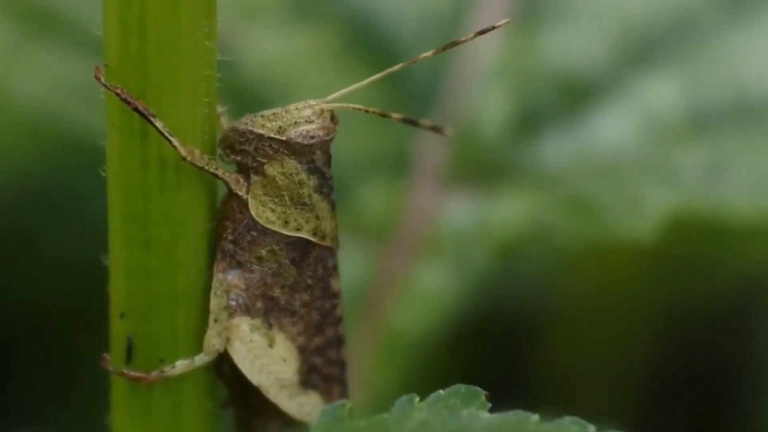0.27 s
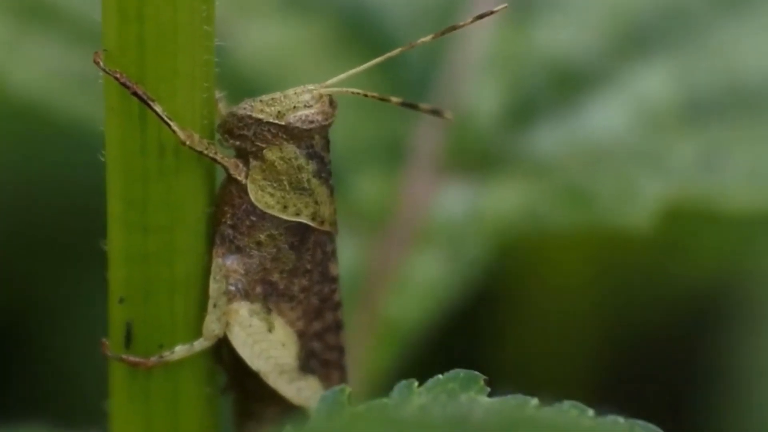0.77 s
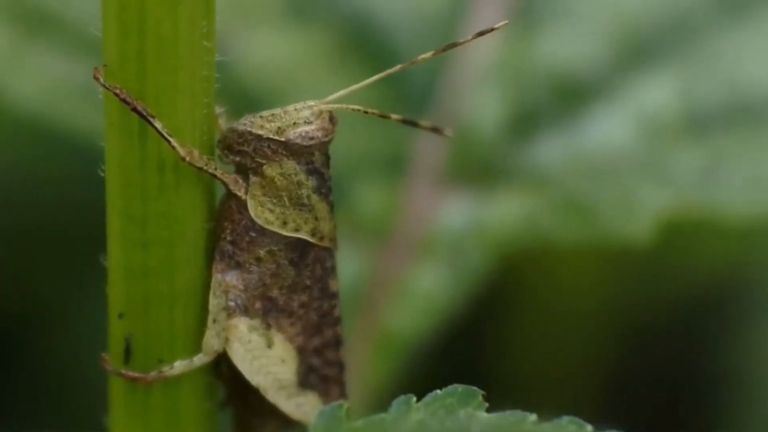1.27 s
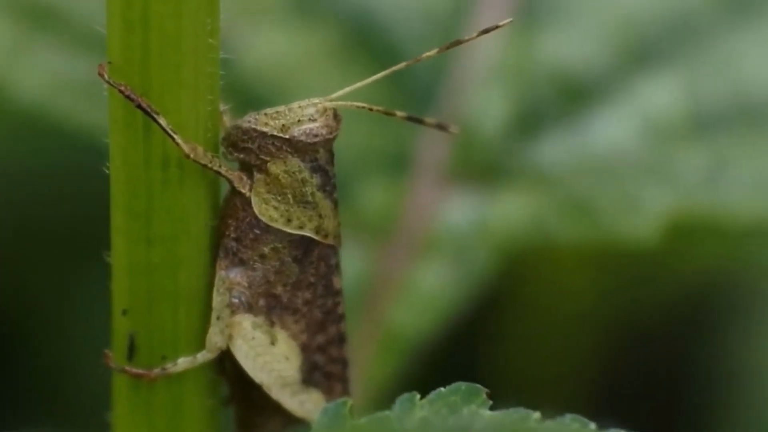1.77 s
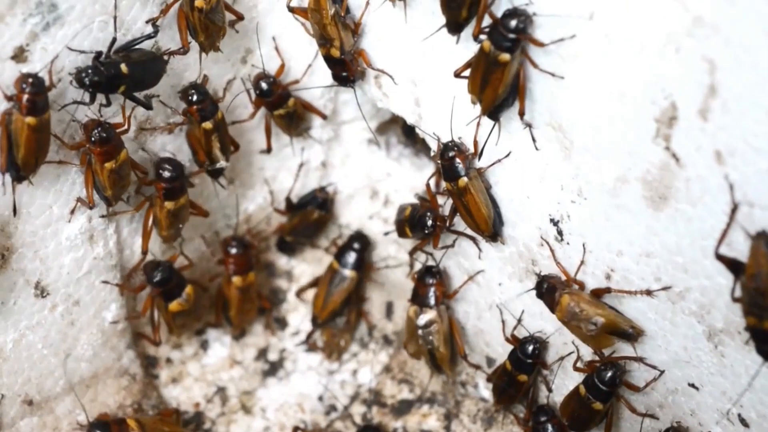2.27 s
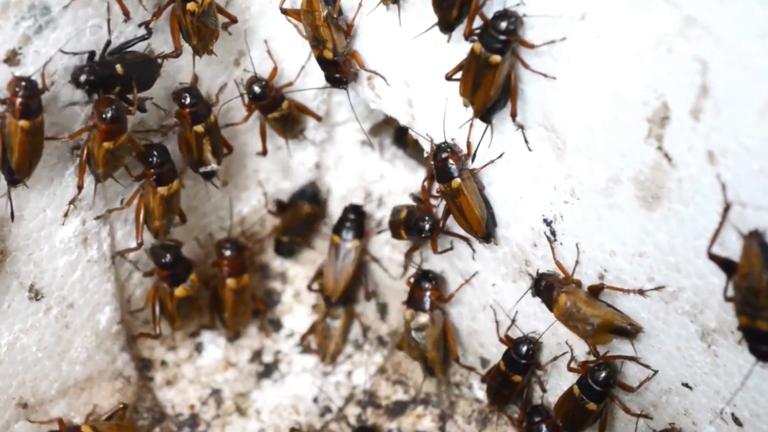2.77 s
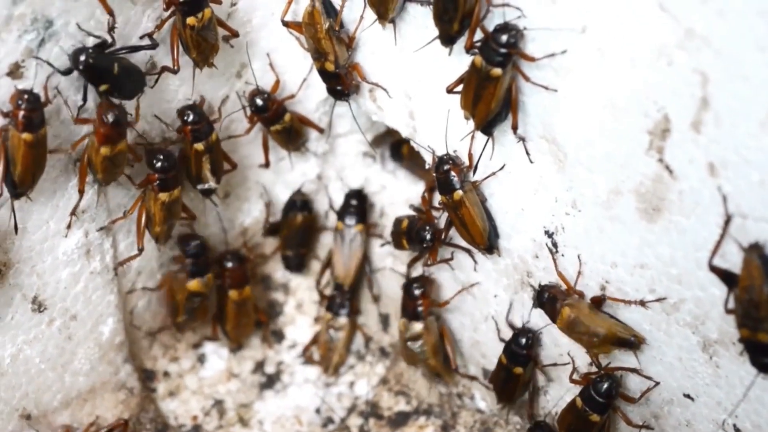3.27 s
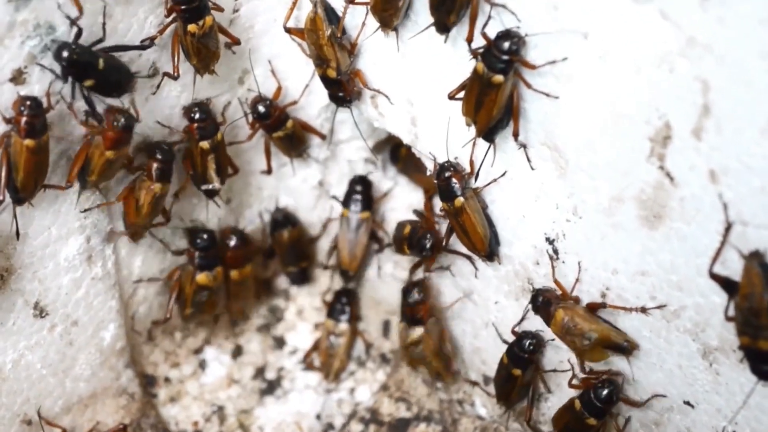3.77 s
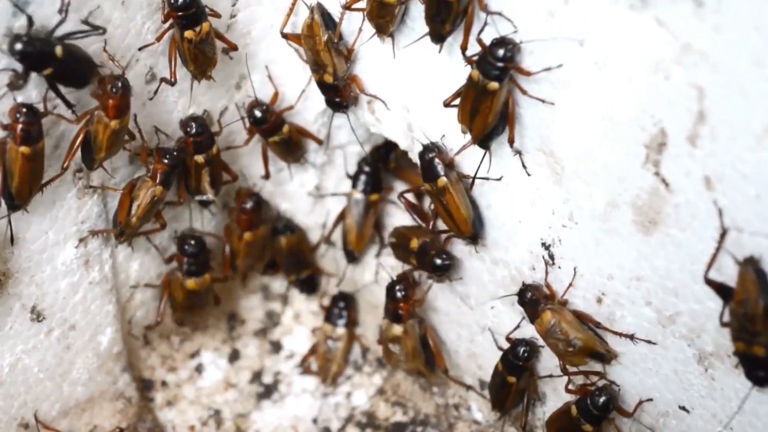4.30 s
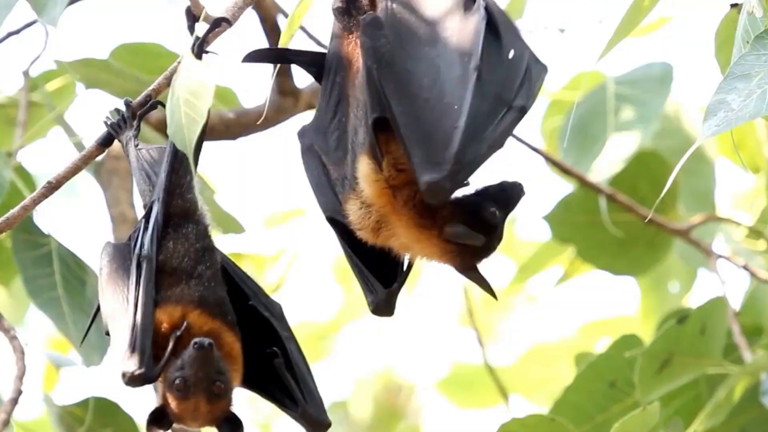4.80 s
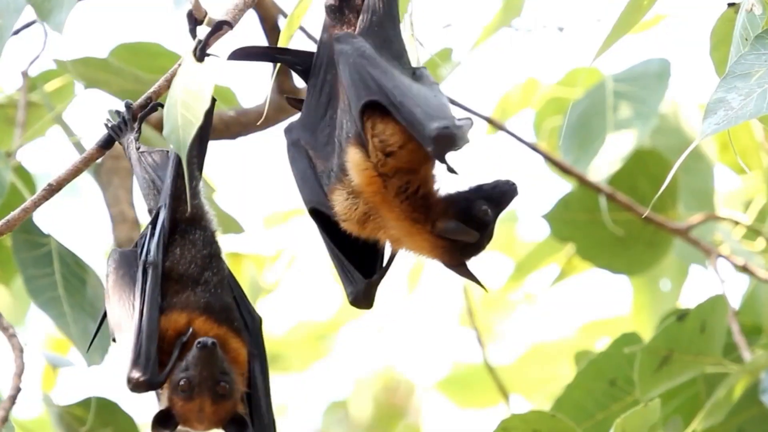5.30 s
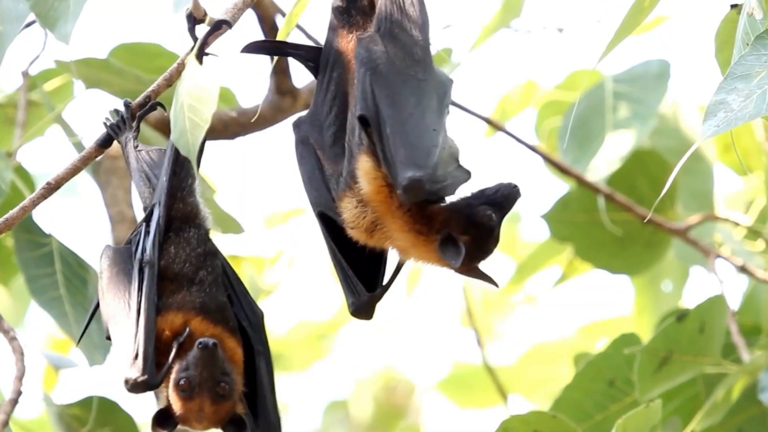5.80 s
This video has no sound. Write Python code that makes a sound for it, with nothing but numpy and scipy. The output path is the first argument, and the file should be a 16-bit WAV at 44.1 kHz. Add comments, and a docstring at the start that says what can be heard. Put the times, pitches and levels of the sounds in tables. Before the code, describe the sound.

Outdoors, a bush cricket gives thin, high buzzing swells through leaves over low far traffic. A hard cut brings a field cricket close to the microphone, chirping in bright clipped groups of up to four falling pulses, with distant birds and a pulsing caller behind. After a tiny silence, dull steady air hiss begins, and bats squeal and chatter harshly over it.

```python
"""Two crickets and a bat roost

Three outdoor places, one after another. A bush cricket trills in swells, its fast strokes blurred by leaves, over
far traffic of coloured noise and drone tones. Then a field cricket chirps close by, up to four falling wing strokes
at a time, each a gliding tone with scrapes and overtones; faint whistling birds and a pulsing far caller lie behind.
After a short silence comes the steady noise hiss of a bat roost, with gliding squeals and rasping chatter."""
import sys
import numpy as np
from scipy import signal
from scipy.fft import rfft, irfft, next_fast_len
from scipy.io import wavfile
from scipy.ndimage import uniform_filter1d

SR = 44100
rng = np.random.default_rng(int(sys.argv[2]) if len(sys.argv) > 2 else 0)


def pcm_store(signal):
    """Save signal as 16-bit PCM."""
    levels = np.round(np.clip(np.atleast_2d(signal), -1, 1) * 32767)
    wavfile.write(sys.argv[1], SR, levels.astype(np.int16).T)


N = 266716
TIME = np.arange(N) / SR
MEADOW_END_S, CHIRPS_END_S, ROOST_START_S = 1.957, 4.858, 4.98

# The field cricket's wing strokes, in chirps of up to four. Each row: start in seconds, length in seconds,
# peak in dB before judder, first pitch in Hz, last pitch in Hz, share of the length before the peak,
# reopening rub in dB before its mix gain, scuff in dB.
STROKES = [(1.944, 0.038, -30.5, 3514, 3093, 0.4, -54, -55), (2, 0.035, -26, 3583, 3080, 0.36, -53, -50.5),
           (2.056, 0.038, -27, 3590, 3140, .45, -46.5, -52),
           (2.494, 0.021, -41, 3374, 3046, 0.67, -49, -52.5),
           (2.529, 0.039, -26.5, 3564, 3130, 0.48, -52.5, -60),
           (2.586, 0.037, -25.5, 3570, 3074, 0.39, -46, -52), (2.643, 0.039, -28, 3573, 3230, .5, -46, -52),
           (3.0655, 0.0207, -31.5, 3410, 3010, 0.52, -46, -56),
           (3.104, 0.031, -25.5, 3580, 3124, 0.44, -48, -45.5),
           (3.158, 0.037, -24, 3537, 3120, 0.23, -43, -48), (3.216, 0.036, -24, 3545, 3244, 0.57, -43, -62),
           (3.609, 0.019, -41.5, 3397, 3100, 0.58, -51.5, -54),
           (3.650, 0.032, -28, 3540, 3117, .42, -48, -47), (3.703, 0.031, -28, 3550, 3320, 0.5, -48, -51),
           (3.763, .04, -33.5, 3590, 3090, 0.48, -45.5, -44),
           (4.215, 0.018, -34.5, 3436, 3130, 0.77, -57, -58),
           (4.255, 0.034, -27.5, 3544, 3133, .4, -54.5, -54),
           (4.307, 0.039, -26, 3553, 3220, 0.38, -43.5, -53),
           (4.366, 0.032, -28, 3566, 3350, 0.71, -42.5, -52),
           (4.807, 0.016, -35.5, 3390, 3070, .5, -46.5, -56),
           (4.841, 0.036, -26, 3560, 3210, 0.65, -51.5, -51)]
# Colour of the tyre noise and the whoosh. Each row: pitch in Hz, relative level in dB.
MEADOW_AIR = [(60, -21), (150, -3.5), (400, -1), (600, -6), (1000, -8.5), (2000, -12), (4000, -20.5),
              (7000, -23), (10000, -24.5), (14300, -31.5), (15300, -64)]
# How alike left and right are in the meadow. Each row: pitch in Hz, correlation (1 = the same).
MEADOW_LIKENESS = [(50, 1), (150, 0.65), (400, 0.37), (1000, 0.06)]
# How alike left and right are around the field cricket. Each row: pitch in Hz, correlation (1 = the same).
CHIRP_LIKENESS = [(50, 0.29), (400, 0.047), (4000, 0.067), (14000, 0.2)]


def from_db(db):
    """Decibels to gain."""
    return 10 ** (np.asarray(db) / 20)


def rms_one(x):
    """Scale to an rms (average strength) of 1."""
    return x / np.sqrt(np.mean(x ** 2) + 1e-20)


def in_time(rows):
    """Each column of a time table, read at every sample."""
    s, *columns = np.transpose(rows)
    return [np.interp(TIME, s, column) for column in columns]


def at_hz(points, hz):
    """Read a table along a logarithmic pitch axis."""
    known, values = np.transpose(points)
    return np.interp(np.log(hz + 1), np.log(known), values)


def pan(left_db):
    """Gains that make the left channel this many dB louder than the right."""
    return from_db(np.array([[left_db], [-left_db]]) / 2)


def drift(rate):
    """Random wandering with spread 1; a higher rate in Hz wanders faster."""
    r = np.exp(-2 * np.pi * rate / SR)
    wander = signal.lfilter([1], [1, -2 * r, r * r], rng.standard_normal(N + SR))
    return rms_one(wander[SR:])  # the first second lets the filter settle


def resonate(x, hz, width):
    """A resonance with a gain of about 1 at its peak; pitch and width in Hz."""
    r = np.exp(-np.pi * width / SR)
    zeros = np.array([1, 0, -1]) * (1 - r * r) / 2
    poles = [1, -2 * r * np.cos(2 * np.pi * hz / SR), r * r]
    return signal.lfilter(zeros, poles, x + 1e-18)


def resonate_twice(x, hz, width):
    """The same resonance two times over, for steeper sides."""
    return resonate(resonate(x, hz, width), hz, width)


def air(spectrum, likeness):
    """Stereo noise of a given colour and left-right likeness, rms 1."""
    size = next_fast_len(N)
    hz = np.arange(size // 2 + 1) * SR / size
    mid, side = rfft(rng.standard_normal((2, size))) * from_db(at_hz(spectrum, hz))
    alike = np.clip(at_hz(likeness, hz), -1, 1)
    both = np.sqrt(1 + alike) * mid + np.sqrt(1 - alike) * side * [[1], [-1]]
    return rms_one(irfft(both, size)[:, :N])


def scatter(x, t60):
    """Dense dying reflections from leaves and ground, different for each ear, as loud as the source."""
    fade = from_db(-60 * TIME[:SR // 2] / t60)  # 60 dB down after t60 seconds
    paths = rng.standard_normal((2, SR // 2)) * fade
    return np.array([rms_one(signal.fftconvolve(x, path)[:N]) for path in paths]) * np.std(x)


def phase_of(hz):
    """Running phase of a moving pitch."""
    return 2 * np.pi * np.cumsum(hz) / SR


def span(start, length):
    """Samples of an event, and its progress from 0 to 1."""
    at = np.flatnonzero((TIME > start) & (TIME < start + length))
    return at, (TIME[at] - start) / length


def arch(progress, power):
    """Swell and fade of one stroke or call; a higher power makes it narrower."""
    return np.abs(np.sin(np.pi * progress)) ** power


def calls(rows, waver_rate):
    """Gliding whistles: sine tones with an unsteady pitch."""
    out, unsteady = np.zeros(N), drift(waver_rate)
    for start, length, db, first_hz, last_hz, waver in rows:
        at, progress = span(start, length)
        hz = (first_hz + (last_hz - first_hz) * progress) * (1 + waver * unsteady[at])
        out[at] += from_db(db) * arch(progress, power=.8) * np.sin(phase_of(hz))
    return out


def field_cricket(bend=2.3, judder_db=1.24, octave_db=-28, octave_mode_db=-21, scrape_db=-33, echo_db=-21,
                  rub_hz=3400, rub_width=300, reopen_s=0.029, rub_modes_db=-22, thump_db=-24):
    """The scraper runs along the file, one tooth a cycle, juddering and slowing; the wings rub as they reopen."""
    # Resonances of the wings. Each row: pitch in Hz, width in Hz of each of two passes, relative level in dB.
    wing_modes = [(2750, 200, -17), (3920, 160, -11.5), (5900, 1500, -4), (6600, 210, 6.5),
                  (9150, 540, -15)]
    # Thin overtones, which sag a little with each stroke. Each row: starting pitch in Hz, dB against the stroke.
    thin_tones = [(8020, -40.5), (9480, -38.5), (10470, -51.5), (12930, -50), (13880, -62.5),
                  (15400, -61.5)]
    # Colour of the soft low thump in each stroke. Each row: pitch in Hz, relative level in dB.
    thump_colour = [(25, -11.5), (60, 4.5), (140, 5), (220, -2.5), (500, -42.5), (2000, -99.5)]
    sag, waver_hz = .33, 45  # overtones: share of the stroke's fall in pitch; unsteadiness

    force, rubbing, fall, hz = np.zeros(N), np.zeros(N), np.zeros(N), np.full(N, float(rub_hz))
    for start, length, db, first_hz, last_hz, peak_at, rub_db, _ in STROKES:
        at, progress = span(start, length)
        leaning = np.interp(progress, [0, np.clip(peak_at, .1, .9), 1], [0, .5, 1])  # moves the peak
        force[at] = from_db(db) * arch(leaning, power=.9)
        hz[at] = first_hz + (last_hz - first_hz) * progress ** bend
        fall[at] = 1 - hz[at] / first_hz
        at, progress = span(start + length / 2, length / 2 + reopen_s)
        rubbing[at] += from_db(rub_db) * arch(progress, power=.7)
    force = force * from_db(judder_db * drift(300))
    teeth = phase_of(hz + 10 * drift(220))

    # a wing mode picks out the octave near the top of each glide
    octave = force * np.sin(2 * teeth)
    octave = from_db(octave_db) * octave + from_db(octave_mode_db) * resonate(octave, 6930, 170)
    tone = force * np.sin(teeth) + octave

    overtones = np.zeros(N)
    for start_hz, db in thin_tones:
        overtone_hz = start_hz * (1 - sag * fall) + waver_hz * drift(400)
        overtones += from_db(db) * np.sin(phase_of(overtone_hz))
    overtones = force * overtones

    # uneven teeth shake the wing modes; these and the overtones radiate differently to each side
    grit = rng.standard_normal((2, N)) + rng.standard_normal(N)
    modes = sum(from_db(db) * resonate_twice(grit, mode_hz, width) for mode_hz, width, db in wing_modes)
    scrape = (from_db(scrape_db) * force + from_db(rub_modes_db) * rubbing) * rms_one(modes)
    sheen = overtones + scatter(overtones, t60=.012) / 2
    rub = rubbing * rms_one(resonate_twice(grit, rub_hz, rub_width))
    thump = from_db(thump_db) * force * air(thump_colour, CHIRP_LIKENESS)
    echo = from_db(echo_db) * scatter(tone, t60=.06)
    return (tone + scrape) * pan(-1.3) + sheen + echo + rub + thump


def wing_scuffs():
    """Short dry noise as one wing catches against the other just before each stroke."""
    # Colour of the scuffs. Each row: pitch in Hz, relative level in dB.
    scuff_colour = [(2200, -23), (2700, 11), (3000, 0.5), (3500, 6.5), (4600, -9.5), (5500, -5.5),
                    (6600, -1), (7500, -21), (9500, -17), (10500, -48.5), (15000, -59)]
    lead_s, scuff_s = 0.014, 0.027
    pressure = np.zeros(N)
    for start, *_, scuff_db in STROKES:
        at, progress = span(start - lead_s, scuff_s)
        pressure[at] += from_db(scuff_db) * arch(progress, power=1)
    return pressure * air(scuff_colour, CHIRP_LIKENESS)


def bush_cricket(fall_hz=1300, waver_hz=60, wing_hz=5110, wing_width=300, trill_db=-0.3, hard_db=1):
    """Short fast strokes, each falling in pitch, fused to a buzz by the foliage; now and then one bites harder."""
    # Strokes that stand out of the trill. Each row: start in seconds, peak in dB before hard_db.
    hard_strokes = [(0.3945, -32.5), (0.414, -34), (0.4604, -32.5), (0.5197, -32), (0.5506, -31),
                    (0.6175, -32), (0.6529, -29), (1.1383, -36), (1.258, -26.5)]
    strokes_per_s, jitter = 50.8, .1  # jitter is a share of the rate
    hard_s, hard_end_hz = .006, 5056

    strength, tooth_hz = swells()
    stroke = np.cumsum(strokes_per_s * (1 + jitter * drift(40))) / SR % 1  # progress within each stroke
    hz = tooth_hz + fall_hz * (.5 - stroke) + waver_hz * drift(170)
    contact = arch(stroke, power=16)
    song = resonate(contact * np.sin(phase_of(hz)), wing_hz, wing_width)

    # much of the sound arrives by way of the leaves; the trill keeps an even strength within a swell
    heard = from_db(-9.5) * song + scatter(song, t60=.2)
    nearby_power = uniform_filter1d(np.mean(heard ** 2, axis=0), size=700)
    even = heard / np.sqrt(nearby_power + 1e-12)

    hard_rows = [(s, hard_s, db, wing_hz, hard_end_hz, 0) for s, db in hard_strokes]
    hard = calls(hard_rows, waver_rate=1)
    return (from_db(trill_db) * strength * even + from_db(hard_db) * hard) * pan(0.88)


def swells():
    """Strength and pitch of the trill: each swell grows, holds and dies away; its pitch lifts, then stays."""
    # Each row: start in seconds, time until the fade in seconds, full level in dB before the trill's gain.
    swell_rows = [(-.48, 0.47, -44.5), (0.277, 0.37, -38), (1.03, 0.31, -37.5), (1.805, .35, -40.5)]
    attack_s, fade_db_per_s = 0.16, 95.5
    start_hz, full_hz, lift_s = 4816, 5056, 0.26
    strength, hz = np.zeros(N), np.full(N, float(full_hz))
    for start, held, db in swell_rows:
        age = TIME - start
        fading_db = db - fade_db_per_s * np.maximum(age - held, 0)
        strength += np.clip(age / attack_s, 0, 1) * from_db(fading_db)
        hz[age > 0] = np.interp(age[age > 0], [0, lift_s], [start_hz, full_hz])
    return strength, hz


def roost(rasp_db=2, shrill_db=0, squeal_db=1, low_squeaks_db=-2, high_squeaks_db=-2.0):
    """Steady hiss of the open air; the colony's rough chatter, scratchy bursts and squeals rise out of it."""
    # Hiss of the air. Each row: time in seconds, level in dB.
    hiss_level = [(4.98, -95), (5.0, -60), (5.012, -44.5), (5.035, -41), (5.5, -41.5), (6.05, -41.5)]
    # Rasping chatter. Each row: time in seconds, level in dB before the rasp's gains.
    chatter_level = [(5.25, -56), (5.308, -62.5), (5.656, -55), (5.76, -50.5), (5.84, -51), (5.866, -50),
                     (5.9, -53), (6.016, -47), (6.04, -50)]
    # Shrill scratchy bursts. Each row: start in seconds, length in seconds, peak in dB before the shrill gains.
    scratches = [(5.277, 0.14, -67), (5.41, 0.16, -69.5), (5.52, 0.11, -65.5), (5.623, 0.096, -67),
                 (5.688, 0.11, -56), (5.78, 0.12, -63.5), (5.857, .13, -64), (5.958, 0.095, -55)]
    # Bat squeals. Each row: start in seconds, length in seconds, peak in dB before mixing,
    # first pitch in Hz, last pitch in Hz.
    squeal_rows = [(5.294, 0.026, -50.5, 7870, 8300), (5.322, 0.03, -48, 8100, 8300),
                   (5.347, 0.033, -47.5, 8200, 8350), (5.374, 0.045, -54, 7600, 7500),
                   (5.688, 0.042, -43.5, 8300, 7700), (5.721, 0.032, -39.5, 7840, 7950),
                   (5.752, 0.03, -41.5, 7500, 7260), (5.784, 0.038, -42, 7670, 7240),
                   (5.847, .032, -49, 5050, 4880), (5.853, 0.03, -45.5, 4300, 4110),
                   (5.858, .02, -48, 5650, 5400), (5.971, 0.057, -50, 3130, 3090),
                   (5.985, .07, -50.5, 4330, 4250), (5.999, 0.071, -48, 6000, 5940)]
    # Colours of the hiss, the rasp and the shrill bursts. Each row: pitch in Hz, relative level in dB.
    hiss_colour = [(15, -29), (25, 3), (86, -1), (293, -6.5), (480, -4), (860, -2), (1460, -10),
                   (2850, -23), (3830, -25.5), (8780, -36.5), (15000, -54)]
    rasp_colour = [(1200, 1.5), (1900, 6), (3000, -3), (4400, -3), (7500, -0.5), (8600, -25), (10000, -47)]
    shrill_colour = [(7500, -20), (8800, 8), (10300, -2), (11400, 2), (12650, 9), (13100, -30),
                     (13500, -45)]
    # How alike left and right are. Each row: pitch in Hz, correlation (1 = the same).
    likeness = [(50, 0.54), (280, 0.94), (640, 0.66), (1400, 0.25), (4000, 0.25), (14000, 0.58)]
    squeal_waver = 0.022  # unsteadiness, as a share of the pitch

    hiss_db, = in_time(hiss_level)
    chatter_db, = in_time(chatter_level)
    bursts = np.zeros(N)
    for start, length, db in scratches:
        at, progress = span(start, length)
        bursts[at] += from_db(db) * arch(progress, power=.7)

    fade_in = np.clip((TIME - 5.25) / 0.046, 0, 1)
    rough = from_db(1.7 * drift(220)) * fade_in
    rasp = from_db(rasp_db) * air(rasp_colour, likeness)
    rasp = rasp + from_db(low_squeaks_db) * squeaks(2973, 9000, count=1400)
    shrill = from_db(shrill_db) * air(shrill_colour, likeness)
    shrill = shrill + from_db(high_squeaks_db) * squeaks(9000, 12400, count=900)
    chatter = rough * (from_db(chatter_db) * rasp + bursts * shrill)

    cries = calls([(*row, squeal_waver) for row in squeal_rows], waver_rate=500)
    squeals = from_db(squeal_db) * (from_db(-4) * cries + from_db(-8.5) * scatter(cries, t60=0.026))
    hiss = from_db(hiss_db) * air(hiss_colour, likeness)
    return hiss + chatter + squeals


def squeaks(low_hz, high_hz, count, length=0.0092, glide=0.045, spread_db=5):
    """A crowd of tiny squeaks, each with its own moment, pitch, length and rise or fall; rms 1 while they last."""
    out = np.zeros(N + SR)
    for when, pitch, size, held, slope in rng.random((count, 5)):
        progress = np.linspace(0, 1, int(length * (.5 + held) * SR))
        start = ROOST_START_S + when * (TIME[-1] - ROOST_START_S)
        at = int(start * SR) + np.arange(len(progress))
        hz = low_hz * (high_hz / low_hz) ** pitch * (1 + glide * (2 * slope - 1) * progress)
        gain = from_db(spread_db * 2 * size)
        out[at] += gain * arch(progress, power=0.65) * np.sin(phase_of(hz))
    heard = scatter(out[:N], t60=0.019)
    return heard / np.std(heard[:, TIME > ROOST_START_S])


def chirp_background(air_db=-50.0, notes_db=0, birds_db=0, chorus_db=-66, chorus_width=220):
    """Quiet air, a repeated pulsing note over a faint chorus at its pitch, and birds far off among the trees."""
    # A far caller repeats one pulsed note. Each row: start in seconds, length in seconds, level in dB before mixing.
    far_notes = [(1.852, 0.25, -54), (2.286, 0.32, -52), (2.642, 0.11, -61.5), (2.851, .32, -52),
                 (3.373, 0.32, -54), (3.868, 0.31, -50), (4.422, 0.23, -51.5)]
    # Bird whistles. Each row: start in seconds, length in seconds, peak in dB before mixing,
    # first pitch in Hz, last pitch in Hz, waver as a share of the pitch.
    bird_rows = [(2.72, 0.19, -61, 2615, 2860, .04), (2.84, 0.19, -54, 2850, 3083, 0.032),
                 (3.94, 0.33, -62, 2625, 2920, 0.042), (4.04, 0.11, -59, 2136, 2440, 0.018),
                 (4.372, 0.056, -48, 1684, 1493, 0.0066), (4.405, .07, -52.5, 1460, 1320, 0.0084),
                 (4.44, 0.16, -64.5, 1386, 1328, 0.014), (4.57, 0.23, -55.5, 2706, 2785, 0.0019),
                 (4.772, 0.041, -43.5, 2770, 2694, 0.0018), (4.81, 0.11, -46.5, 2737, 2736, 0.00097)]
    # Colour of the quiet air. Each row: pitch in Hz, relative level in dB.
    air_colour = [(20, -6.5), (55, 1.5), (110, -4.5), (200, -8.5), (400, -6), (750, -10), (1300, -17),
                  (2600, -18.5), (4000, -27), (6000, -29), (7500, -39), (9300, -44.5), (10200, -57),
                  (15000, -65.5)]
    note_hz, note_waver = 2070, 0.03  # waver is a share of the pitch

    pulsing = arch(TIME * 34.5, power=1.6) * np.sqrt(2)  # 34.5 pulses a second
    note_rows = [(*row, note_hz, note_hz, note_waver) for row in far_notes]
    notes = calls(note_rows, waver_rate=180) * pulsing
    notes = from_db(-2.5) * notes + from_db(-3.5) * scatter(notes, t60=.11)
    chorus = rms_one(resonate_twice(rng.standard_normal((2, N)), note_hz, chorus_width))
    whistles = calls(bird_rows, waver_rate=190)
    birds = from_db(-2) * whistles + from_db(-1.5) * scatter(whistles, t60=.35)
    far = from_db(notes_db) * notes + from_db(chorus_db) * chorus + from_db(birds_db) * birds
    return from_db(air_db) * air(air_colour, CHIRP_LIKENESS) * pan(-0.51) + far


def meadow(rumble_db=0, tyres_db=4, lag_s=0.00017):
    """Far traffic: rumble and tyre noise of moving level, and an engine drone of wandering tones."""
    # Each row: time in seconds, rumble in dB, tyre noise in dB, both before the gains above.
    traffic = [(0.0, -44, -50.5), (0.21, -46.5, -51), (0.228, -48, -51), (0.456, -43.5, -49.5),
               (0.586, -50, -51), (0.754, -44.5, -50.5), (0.976, -53, -50.5), (1.374, -39.5, -50),
               (1.58, -46.5, -50.5), (1.754, -45, -51), (1.818, -52, -50.5), (1.95, -47, -50.5)]
    # Engine drone. Each row: centre pitch in Hz, rms level in dB that the tone wanders around.
    drone_tones = [(42.5, -54), (131, -55), (188.4, -52.5), (322.5, -58)]
    # Colour of the rumble. Each row: pitch in Hz, relative level in dB.
    rumble_colour = [(18, -34), (28, -9.5), (44, 5.5), (75, 1), (100, -4.5), (135, -7.5), (175, -8),
                     (260, -48)]

    low_db, high_db = in_time(traffic)
    drone = np.zeros(N)
    for centre_hz, db in drone_tones:
        gain = from_db(db + 3.3 * drift(31.0)) * np.sqrt(2)
        drone += gain * np.sin(phase_of(centre_hz * (1 + 0.01313 * drift(4.49))))
    rumble = from_db(low_db + rumble_db) * air(rumble_colour, MEADOW_LIKENESS)
    tyres = from_db(high_db + tyres_db) * air(MEADOW_AIR, MEADOW_LIKENESS)
    left, right = drone + rumble + tyres
    # the road lies to the left, so its sound reaches the right side later
    return np.array([left, np.interp(TIME - lag_s, TIME, right)])


def far_whoosh(centre_hz=640, width=330):
    """A brief hollow swell in the traffic: noise through one resonance."""
    # Each row: time in seconds, level in dB.
    whoosh_level = [(1.4, -80.5), (1.53, -51), (1.6, -42.5), (1.68, -48.5), (1.8, -51.5), (1.95, -66)]
    level_db, = in_time(whoosh_level)
    return from_db(level_db) * rms_one(resonate(air(MEADOW_AIR, MEADOW_LIKENESS), centre_hz, width))


def until(end_s):
    """Open until a cut, closing abruptly."""
    return np.clip((end_s - TIME) / .00008, 0, 1)


def scene():
    """The three places follow each other with hard cuts."""
    first = (meadow() + far_whoosh() + bush_cricket()) * until(MEADOW_END_S)
    second = chirp_background() + field_cricket() + wing_scuffs()
    second = second * (TIME >= MEADOW_END_S) * until(CHIRPS_END_S)
    third = roost() * (TIME > ROOST_START_S)
    return first + second + third


def record(dry):
    """The treble above 15600 Hz is cut steeply."""
    return signal.sosfilt(signal.ellip(10, .1, 80, 15600, fs=SR, output="sos"), dry)


dry = scene()
out = record(dry)
pcm_store(out)
```